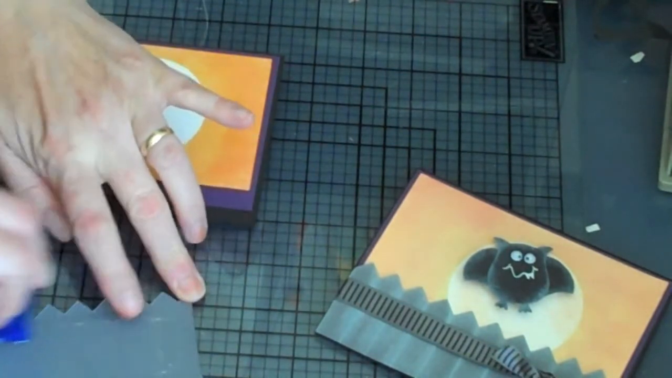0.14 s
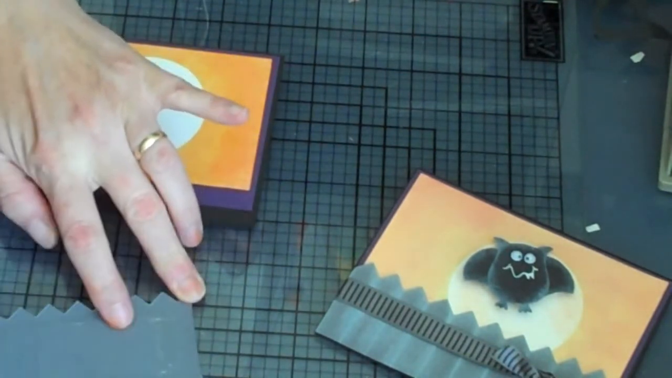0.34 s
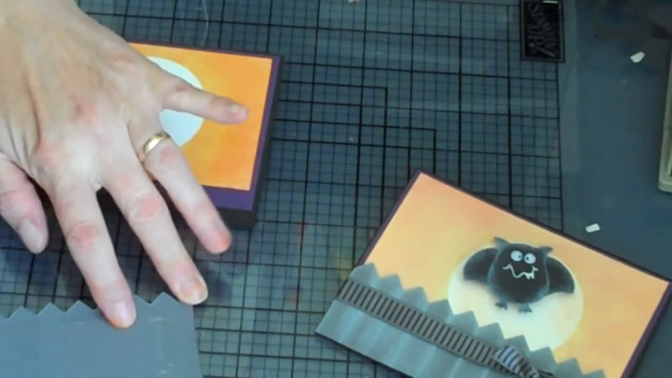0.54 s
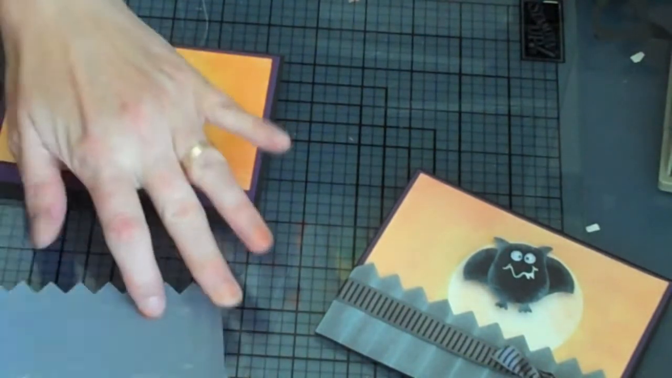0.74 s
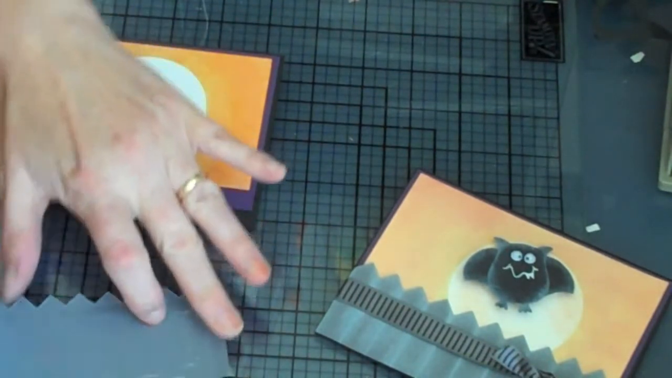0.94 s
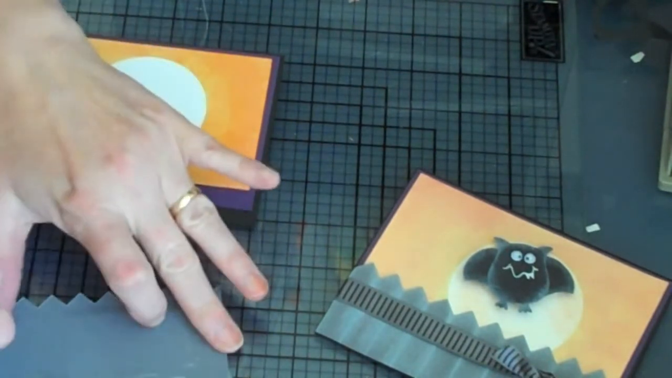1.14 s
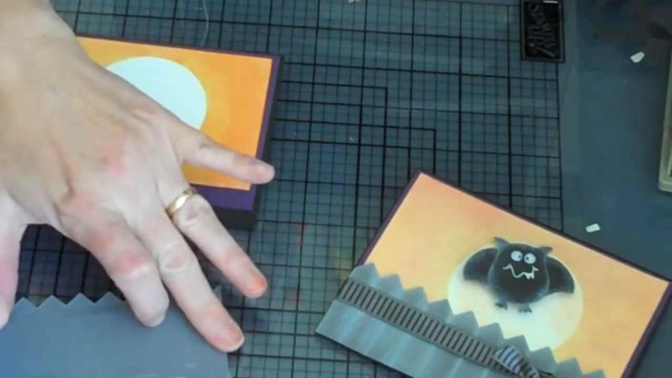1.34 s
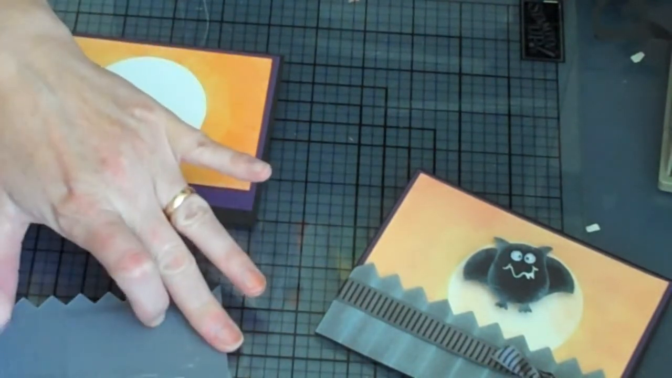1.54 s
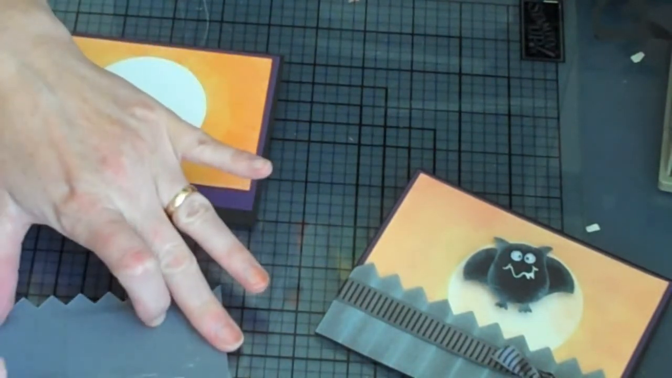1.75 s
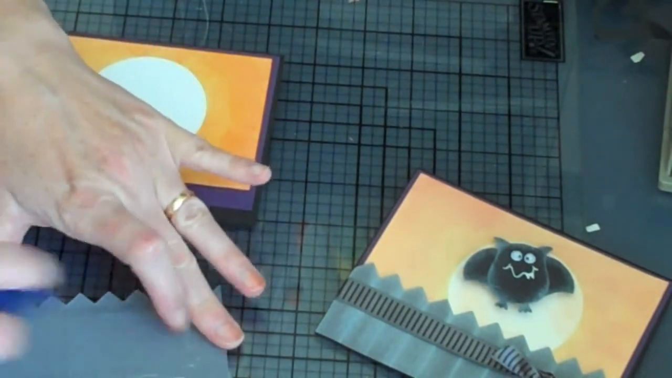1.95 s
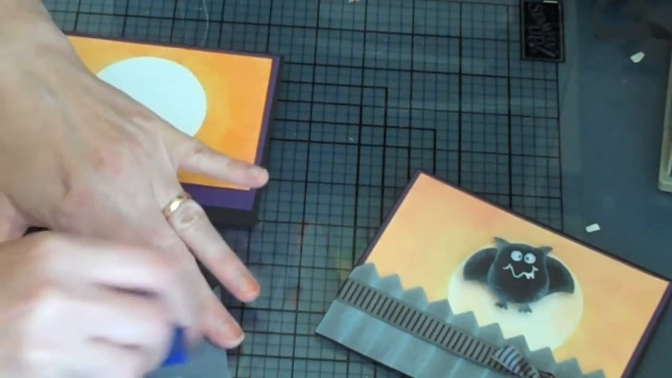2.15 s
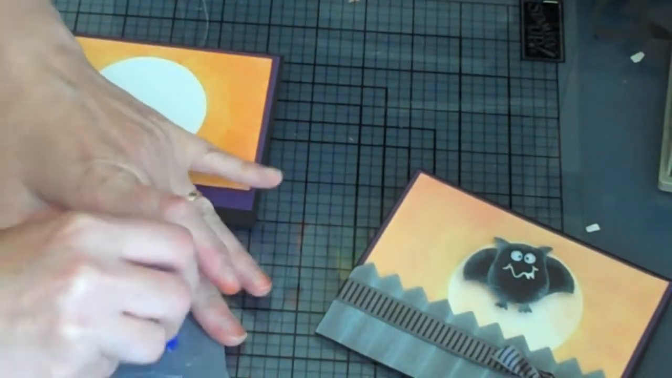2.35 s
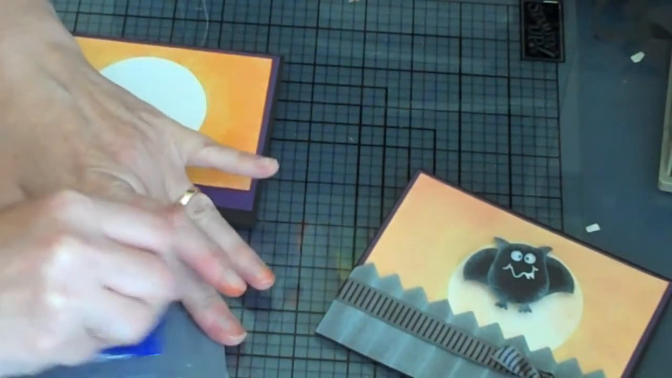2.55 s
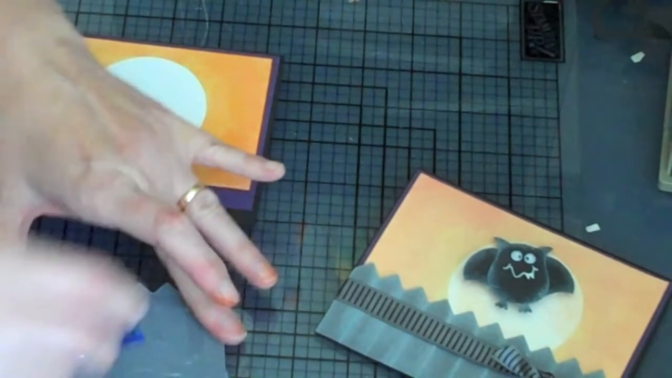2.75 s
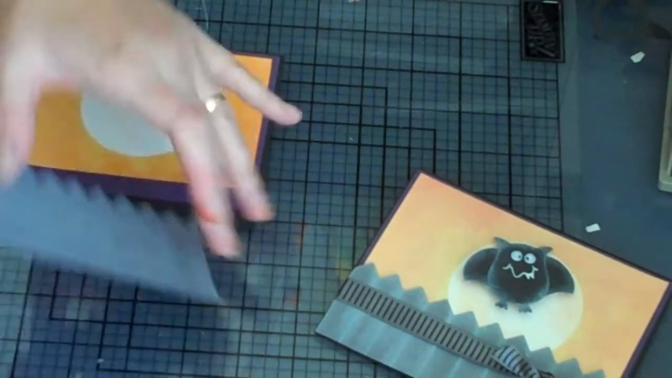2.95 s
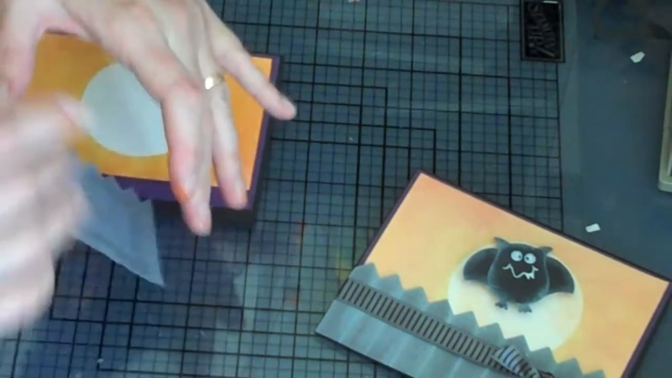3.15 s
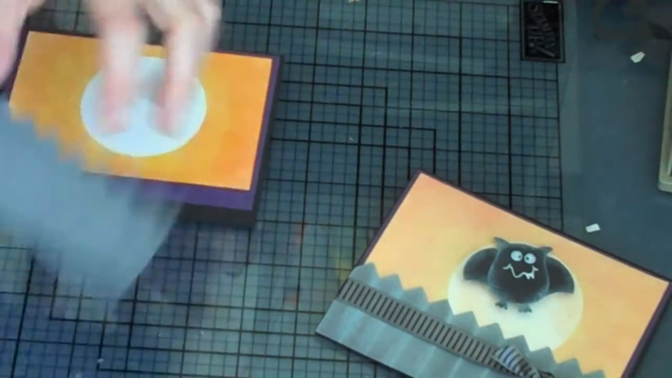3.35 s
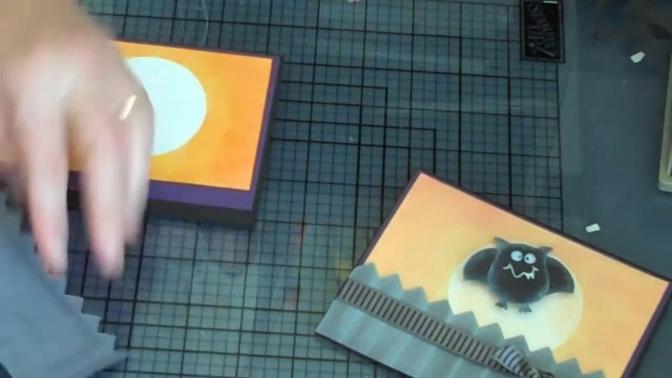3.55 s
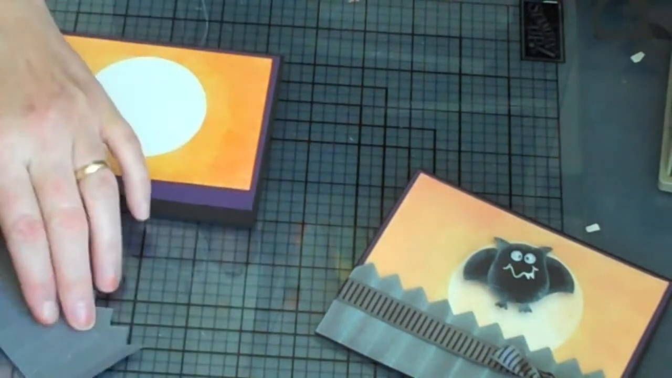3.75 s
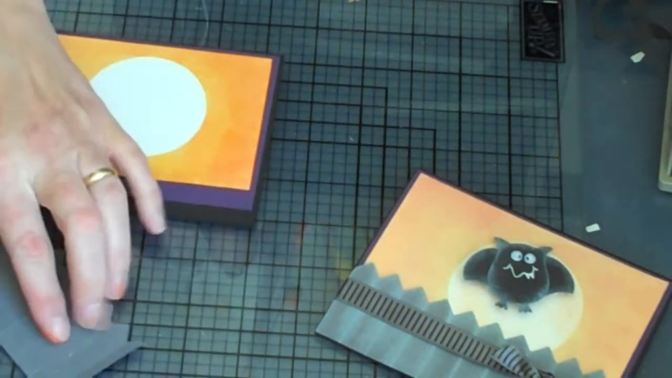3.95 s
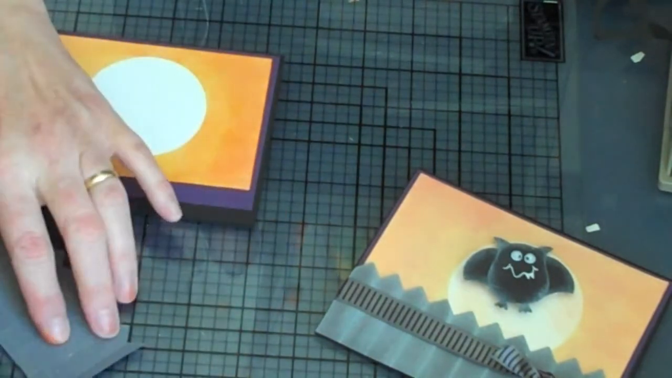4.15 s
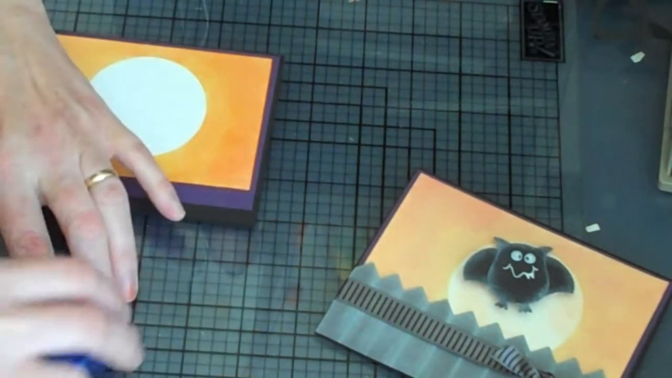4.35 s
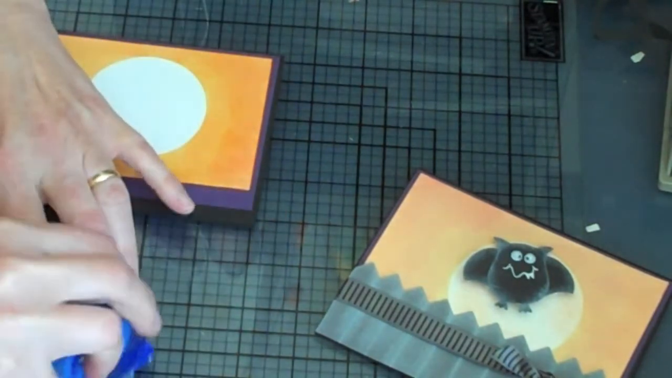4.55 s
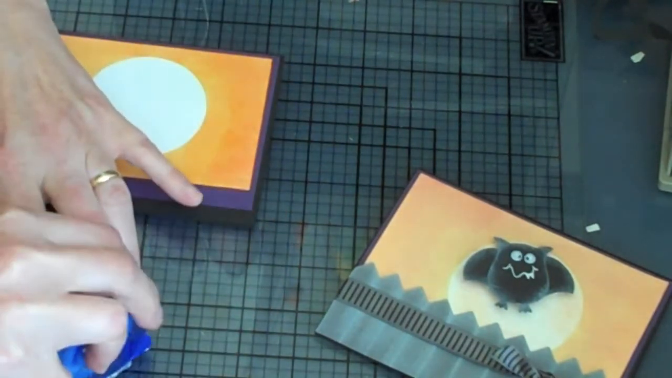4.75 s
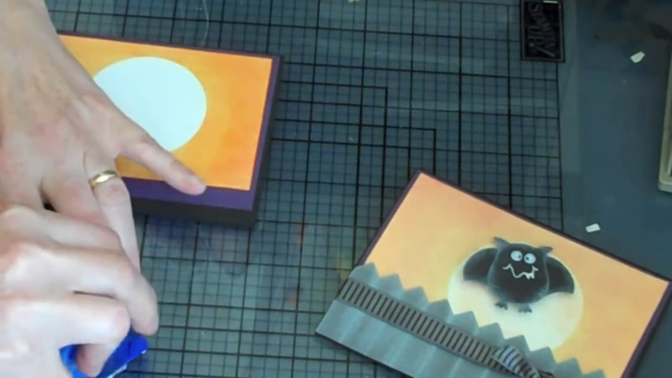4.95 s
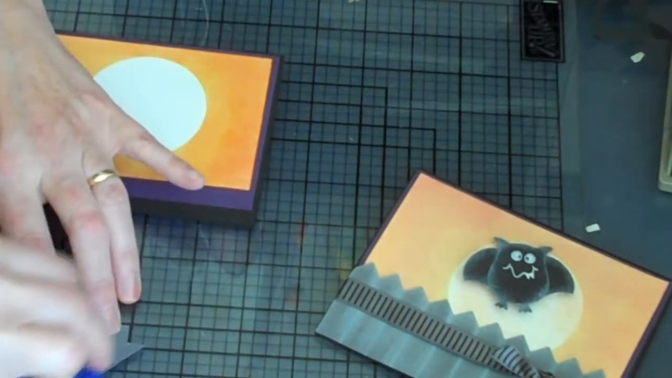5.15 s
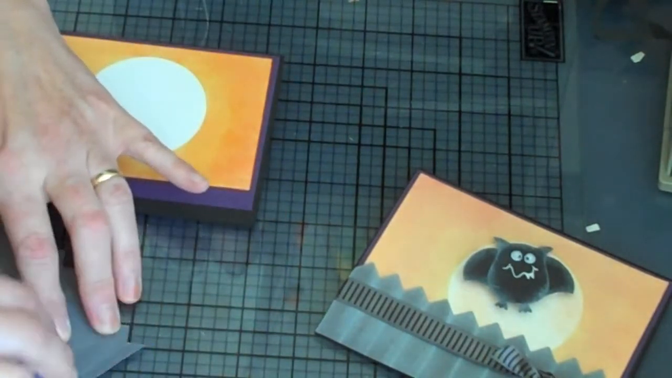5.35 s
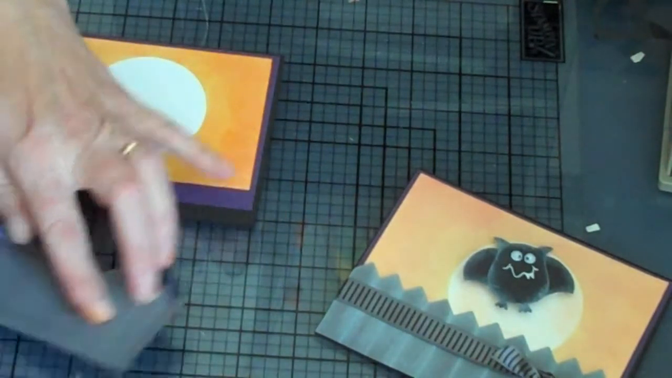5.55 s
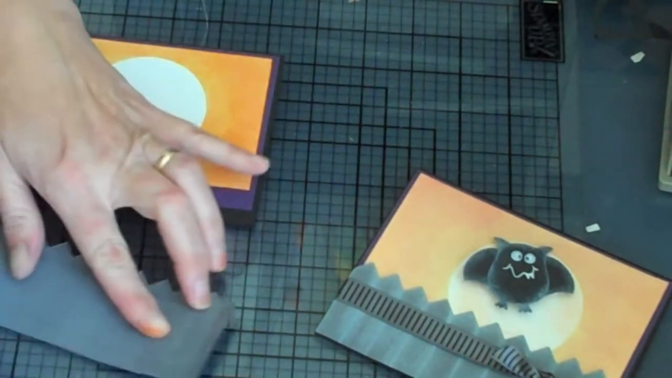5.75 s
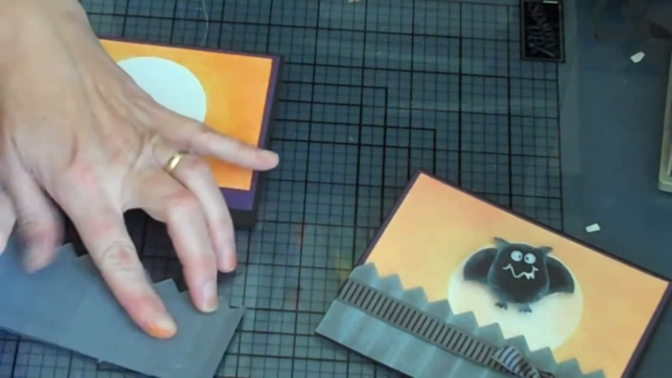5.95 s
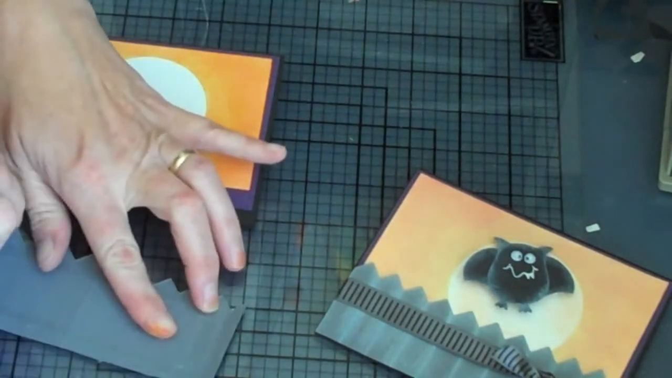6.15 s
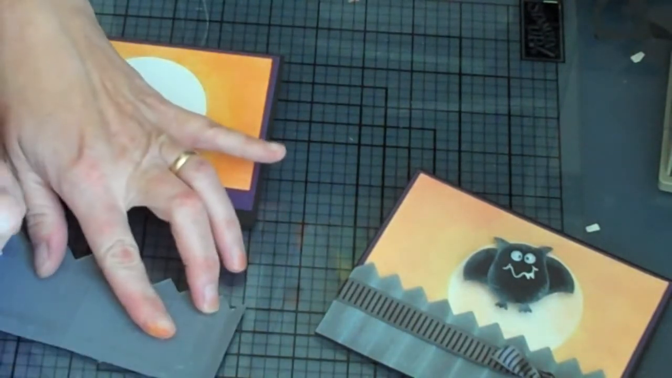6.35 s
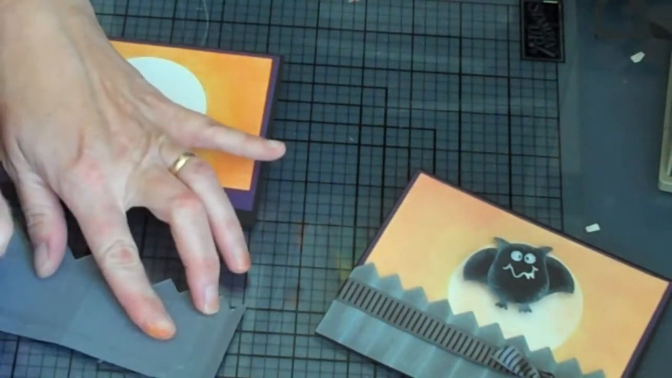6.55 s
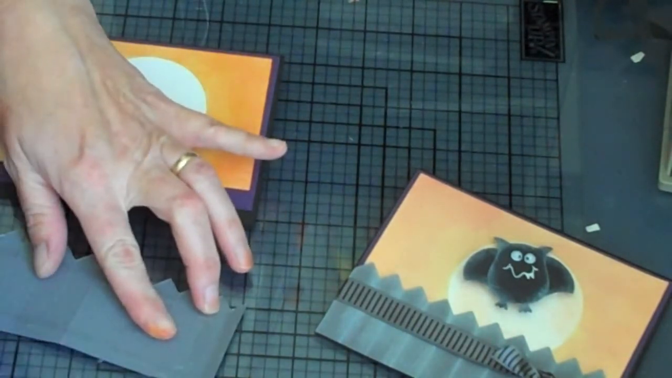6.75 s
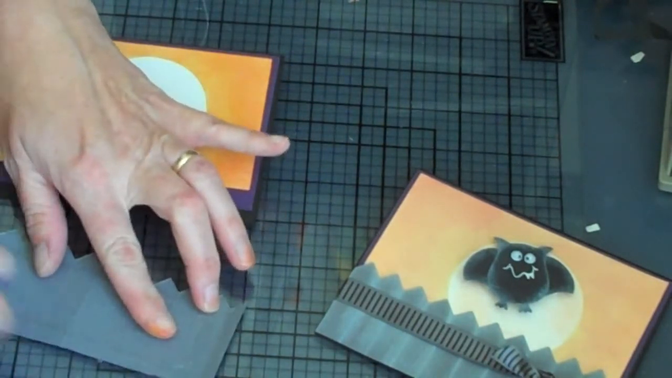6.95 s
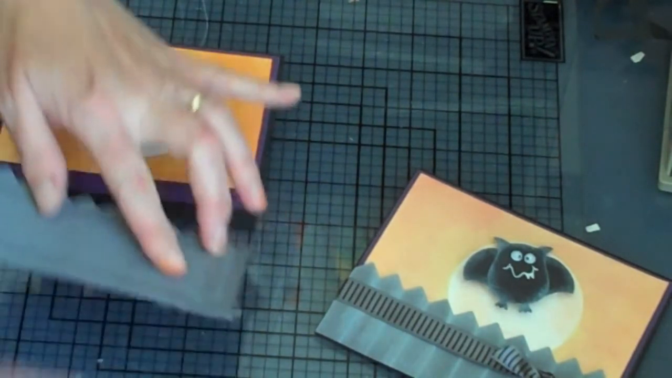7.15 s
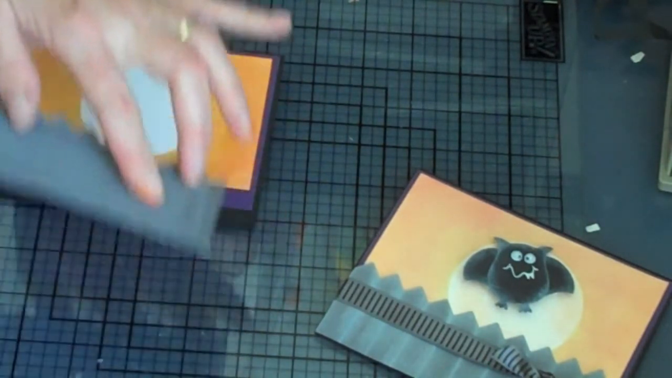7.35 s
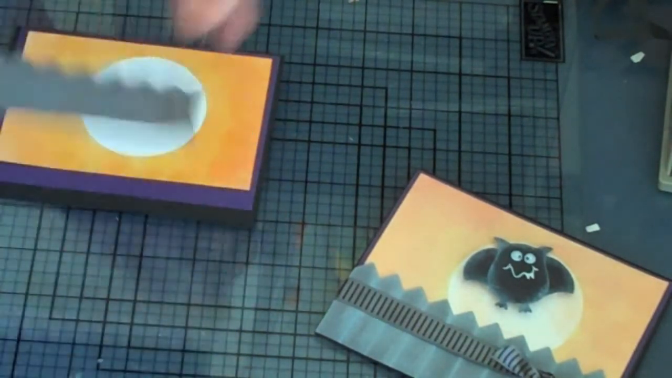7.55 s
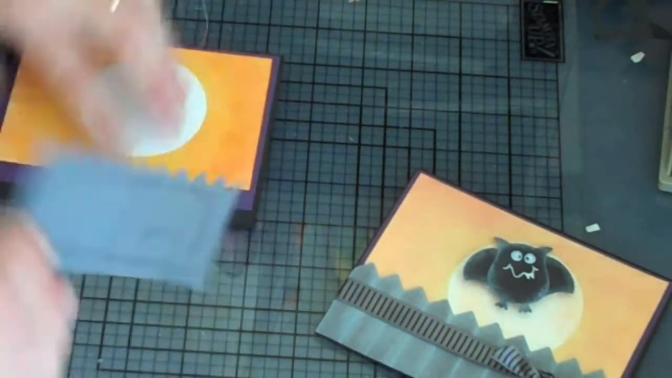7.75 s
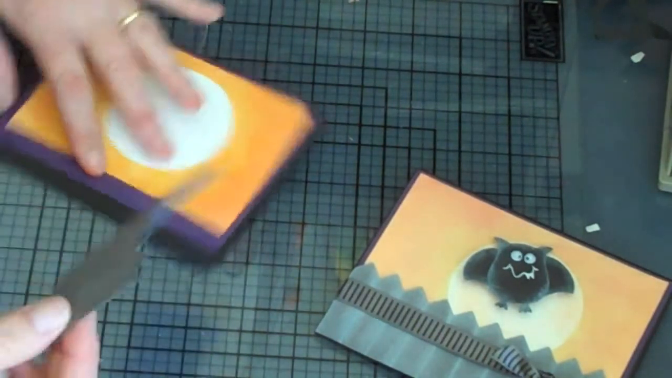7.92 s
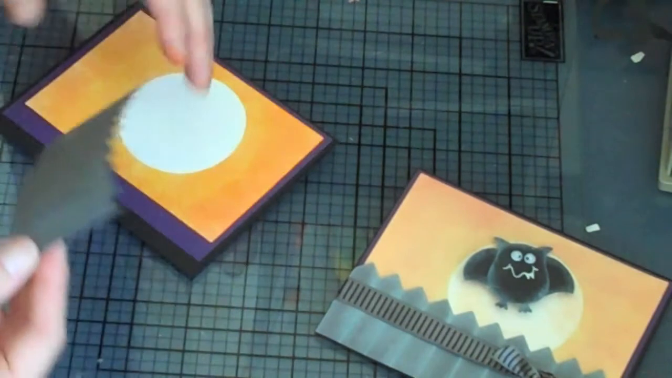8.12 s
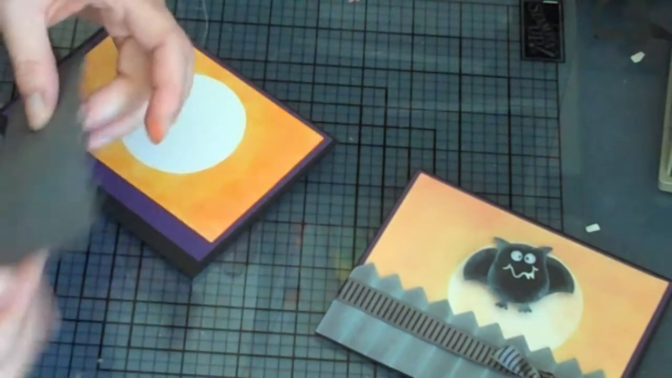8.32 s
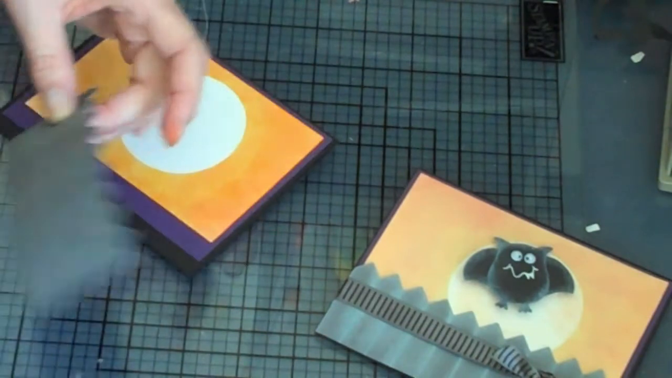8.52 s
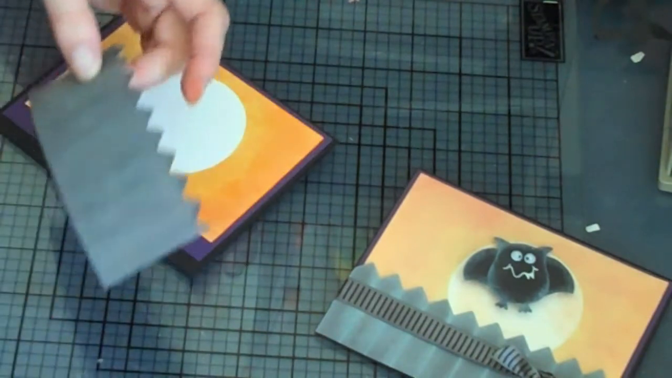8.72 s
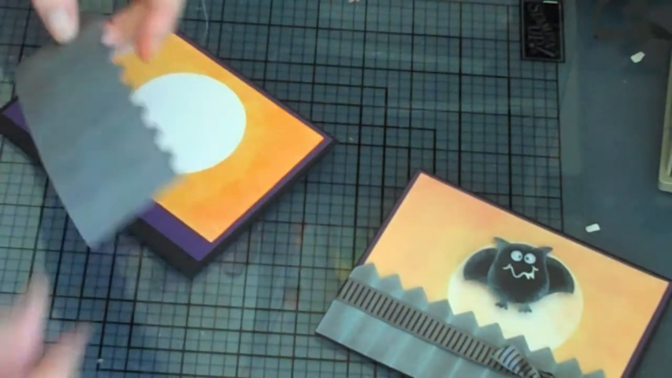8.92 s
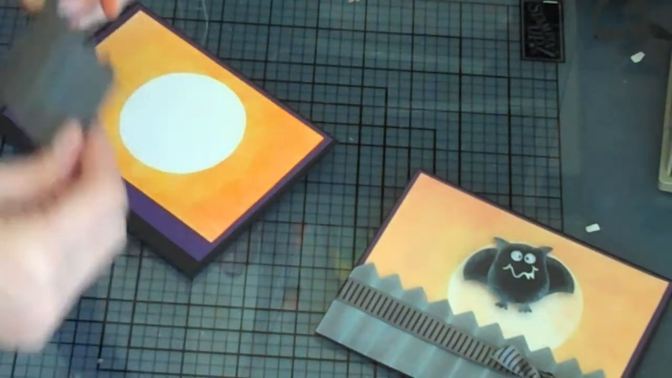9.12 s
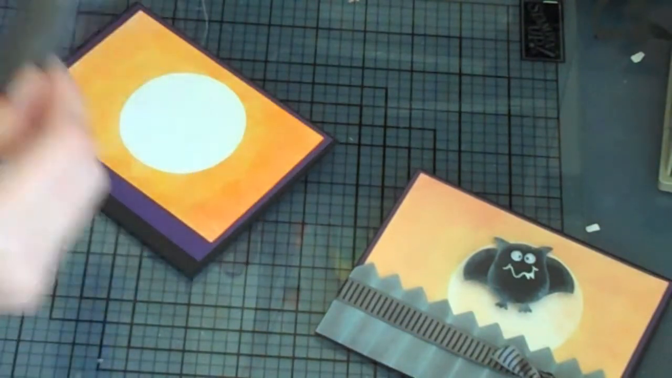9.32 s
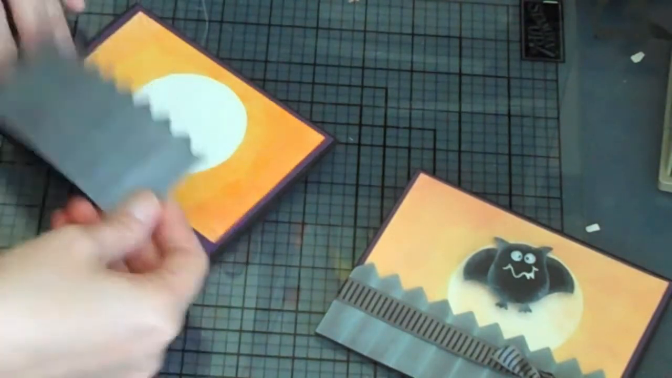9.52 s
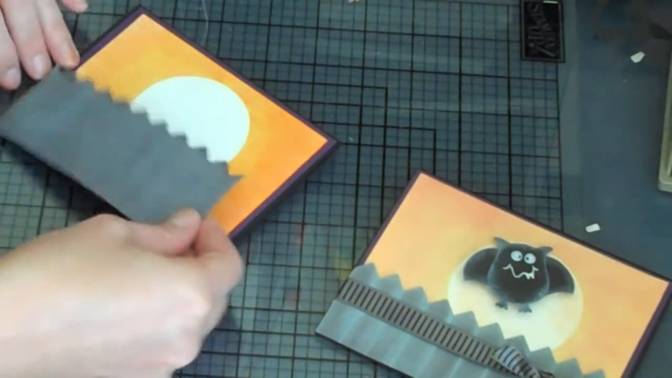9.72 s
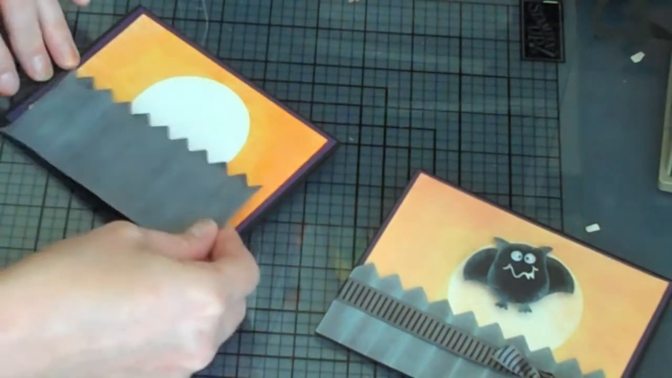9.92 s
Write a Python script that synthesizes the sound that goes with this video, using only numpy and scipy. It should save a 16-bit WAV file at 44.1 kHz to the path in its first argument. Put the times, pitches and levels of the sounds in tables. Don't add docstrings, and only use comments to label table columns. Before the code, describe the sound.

A plastic tape dispenser zips in brief bursts along stiff card; the strip snaps, ticks and knocks the desk, then handling fades into hiss.

```python
import sys
import numpy as np
from scipy import signal
from scipy.fft import rfft, irfft, next_fast_len
from scipy.io import wavfile
from scipy.ndimage import uniform_filter1d

SR = 44100
rng = np.random.default_rng(int(sys.argv[2]) if len(sys.argv) > 2 else 0)


def gain_from_db(level_db):
    decades = np.asarray(level_db, float) / 20
    return 10 ** decades


def materialize(psi):
    bounded = np.clip(np.atleast_2d(psi).T, -1, 1)
    quanta = np.round(bounded * 32767).astype(np.int16)
    wavfile.write(sys.argv[1], SR, quanta)


N = 440118


def unit(x):
    return x / np.sqrt(np.mean(x ** 2) + 1e-20)


def along(points, hz):
    f, v = np.transpose(points)
    return np.interp(np.log(hz + 1), np.log(f + 1), v)


def causal(gain):
    cepstrum = irfft(np.log(gain + 1e-6))
    half = cepstrum.shape[-1] // 2
    cepstrum[..., 1:half] *= 2
    cepstrum[..., half + 1:] = 0
    return np.exp(rfft(cepstrum))


def filtered(x, response, even=False):
    size = 2 * next_fast_len(N // 2 + SR // 8)
    h = response(np.fft.rfftfreq(size, 1 / SR))
    if even:
        h = h / np.sqrt(np.mean(abs(h) ** 2))
    return irfft(rfft(x, size) * h, size)[..., :N]


def slips(spiky_db, clump, patchy_db):
    z = signal.stft(rng.standard_normal((2, N + 256)), nperseg=128)[2]
    patches = uniform_filter1d(rng.standard_normal(z.shape[1:]), size=2, axis=0)
    patches = uniform_filter1d(patches, size=6, axis=1)
    pair = signal.istft(z * gain_from_db(patchy_db * unit(patches)), nperseg=128)[1][:, :N]
    size = unit(uniform_filter1d(rng.standard_normal(N), size=clump))
    return unit(gain_from_db(spiky_db * size) * pair)


def contacts(times, levels_db, ms, rise, fall, creep_db):
    early = SR // 40
    force = np.zeros((levels_db.shape[1], N + SR))
    t = np.arange(-early, SR // 8) / SR
    lives = np.clip(ms, .3, 60) / 1000
    for s, db, life in zip(times, levels_db, lives):
        onset = 1 - np.exp(-np.clip(t, 0, 1) / (rise * life))
        shape = onset * np.exp(-(t / (fall * life)) ** 2)
        shape += gain_from_db(creep_db) * np.exp(-abs(t) / 0.0052)
        start = max(round((s - rise * life) * SR), 0)
        force[:, start:start + len(t)] += gain_from_db(db)[:, None] * shape
    return force[:, early:early + N]


def hiss():
    # (frequency [Hz], level [dB])
    noise_colour = [(15, -46.5), (25, 0), (392, -2), (485, -2.5), (1870, -7), (6850, -12), (7420, -11),
                    (14000, -16.5)]
    # (frequency [Hz], left minus right [dB])
    noise_balance = [(60, 2.5), (180, 5.3), (550, 12), (1640, 9.4), (4950, 3.5), (14900, 2.5)]

    def colour(hz):
        return gain_from_db(along(noise_colour, hz) + np.outer([.5, -.5], along(noise_balance, hz)))

    return gain_from_db(-59) * filtered(rng.standard_normal((2, N)), colour, even=True)


def slide():
    # (time [s], rub level [dB])
    rubbing = [(0.0, -26.5), (0.11, -33.5), (0.61, -54), (1.42, -60.5), (1.66, -32), (1.94, -69),
               (2.64, -55), (4.97, -63.5), (5.14, -28), (5.39, -55), (6.42, -62.5), (6.61, -30),
               (6.89, -61), (7.34, -69.5), (7.53, -61), (9.53, -70), (9.98, -63.5)]
    # (frequency [Hz], level [dB])
    rub_colour = [(600, -34.5), (1600, -11.5), (3000, -10.5), (5500, -0.5), (7500, 0), (9200, -12.5),
                  (14000, -14.5)]
    s, db = np.transpose(rubbing)
    swell = gain_from_db(np.interp(np.arange(N) / SR, s, db) + 2)
    grains = swell * slips(spiky_db=-1.0, clump=150, patchy_db=2.5)
    return filtered(grains, lambda hz: gain_from_db(along(rub_colour, hz)), even=True)


def snap(force, part=lambda hz: 1):
    # (frequency [Hz], level [dB])
    snap_colour = [(1800, -36.5), (2600, -13.5), (3530, -12), (4300, -7), (5900, 2.5), (7300, 2),
                   (9250, -13.5), (10400, -16), (14000, -23.5)]
    return filtered(force, lambda hz: causal(gain_from_db(along(snap_colour, hz)) * part(hz)), even=True)


def case(force):
    # (frequency [Hz], width [Hz], level [dB])
    modes = [(1210, 320, -10), (1587, 140, 0.5), (1957, 310, -4), (2274, 250, -5.5)]

    def ring(f):
        total = 0
        for k, (centre, width, db) in enumerate(modes):
            damping = 1j * f * width
            total = total + (-1) ** k * gain_from_db(db) * damping / (centre * centre - f * f + damping)
        return total

    return filtered(force, ring, even=True)


def desk(force):
    # (frequency [Hz], level [dB])
    desk_colour = [(100, -24.5), (300, -0.5), (420, -8), (560, -3), (900, -3), (1500, -22)]
    return filtered(force, lambda hz: causal(gain_from_db(along(desk_colour, hz))), even=True)


def runner():
    # (time [s], snap level [dB], case level [dB])
    teeth = [(0.008, -11.5, -23.5), (0.022, -16, -25.5), (0.035, -11.5, -21), (0.05, -14, -31),
             (0.062, -16.0, -23), (0.076, -19, -23.5), (0.086, -10, -39.5), (0.1, -16, -42),
             (0.112, -14.5, -27), (0.125, -16.0, -33), (0.135, -12, -24), (0.148, -19.5, -28.5),
             (0.157, -11.5, -24.5), (0.171, -12.5, -34), (0.184, -11, -25), (0.195, -17, -35.5),
             (0.206, -14, -26.5), (0.22, -23, -21), (0.23, -13.5, -41), (0.243, -15, -35),
             (0.256, -17.5, -39), (0.268, -13.5, -27), (0.288, -13, -26.0), (0.31, -12, -44.5),
             (0.323, -34.5, -44), (0.336, -13.5, -28.5), (0.384, -21, -30.5), (1.5, -11.5, -25),
             (1.515, -13, -30), (1.531, -13.5, -25), (1.544, -14.5, -33.5), (1.555, -16.0, -32.5),
             (1.566, -19, -28.5), (1.576, -9, -26), (1.584, -14.5, -26.5), (1.601, -12.0, -29.5),
             (1.617, -12.5, -25), (1.634, -14.5, -28.0), (1.657, -16, -31.5), (1.717, -12, -33),
             (1.766, -13.5, -29.0), (2.504, -12, -31.0), (2.515, -16.5, -28), (2.524, -18, -31),
             (2.537, -11, -29.5), (2.545, -11.5, -30.5), (2.558, -20, -31.5), (2.57, -13, -26),
             (2.584, -20, -28), (2.601, -20.5, -40.5), (2.612, -11, -25.5), (4.961, -12.5, -29),
             (4.988, -15, -30), (5.011, -12.5, -33), (5.03, -11.5, -32), (5.048, -13.5, -32.0),
             (5.065, -9.5, -34.5), (5.081, -13, -25), (5.1, -18, -38.0), (5.117, -14, -33),
             (5.129, -15, -30.5), (5.144, -24, -26.5), (5.157, -12.5, -35), (5.175, -12, -34),
             (5.195, -15.5, -26.5), (5.214, -11.5, -32.5), (5.237, -14, -28), (6.417, -13, -24.5),
             (6.428, -19.5, -34), (6.447, -11.5, -31), (6.468, -12.5, -26.5), (6.498, -12.5, -29),
             (6.536, -14.5, -30.5), (6.557, -13, -30.5), (6.572, -17.0, -29.5), (6.588, -14.5, -22),
             (6.606, -15.5, -32), (6.619, -14, -31), (6.634, -17, -22.5), (6.647, -14.5, -28),
             (6.661, -14, -30), (6.674, -16.0, -33.5), (6.693, -20, -41)]
    rows = np.array(teeth)
    life_ms = 5.35 * gain_from_db(rng.normal(0, 1.0, len(rows)))
    bright, hollow = contacts(rows[:, 0], rows[:, 1:], life_ms, rise=.15, fall=0.98, creep_db=-18)
    chatter = slips(spiky_db=4, clump=14, patchy_db=2.0)
    snaps = gain_from_db(-2.0) * snap(bright * chatter)
    rings = gain_from_db(-0.5) * case(hollow * chatter)
    shakes = gain_from_db(-31.5) * desk(hollow * chatter)
    return snaps + rings + shakes


def strip():
    # (time [s], crisp level [dB], full level [dB], hollow level [dB], contact [ms])
    between_swipes = [(0.452, -42.5, -46, -50.0, 5.2), (0.466, -36.5, -49, -55.0, 2.3),
                      (0.485, -38, -51, -49, 10), (0.499, -19, -22, -32, 1.4),
                      (0.538, -11, -26.5, -34.5, 3.9), (0.636, -28, -48, -56, 1.0),
                      (0.645, -41.5, -46.5, -39.5, 7.5), (0.711, -46, -43.0, -38.5, 8.7),
                      (0.727, -46, -47.0, -40, 2.3), (0.859, -34, -47, -55.0, 2.7),
                      (0.973, -40.5, -47.0, -59.0, 2), (1.105, -48, -59, -71.0, 8.3),
                      (1.343, -32.5, -29, -30.5, 3.9), (1.357, -34, -39.5, -39.5, 10.0),
                      (1.445, -55, -62, -49, 2.6), (1.469, -35, -43, -41, 2.0),
                      (1.828, -32.5, -38.5, -56.5, 9.4), (1.901, -43, -50, -56.0, 4.0),
                      (2.033, -40.5, -45.0, -56, 2.7), (2.117, -21, -24.5, -44.5, 2.5),
                      (2.223, -51, -62.0, -65, 3.0), (2.259, -41, -64, -63.0, 1.0),
                      (2.272, -39, -48, -53.0, 3.0), (2.308, -33, -50, -38, 0.71),
                      (2.328, -46, -54, -58, 8.6), (2.384, -47.0, -53.0, -56.0, 3.0),
                      (2.418, -28, -35, -36, 4.9), (2.429, -24.5, -27, -36, 3.3),
                      (2.484, -43, -46, -32, 1.3), (2.67, -31.5, -41, -43.5, 20),
                      (2.692, -29, -37, -51, 2.4), (2.748, -52.5, -59, -69, 10),
                      (2.781, -48, -53, -60, 5.2), (2.793, -46.5, -52.0, -51, 2.1),
                      (2.818, -47, -44, -53, 4.0), (2.83, -41, -54.0, -58, 2.5),
                      (2.892, -9.0, -13.0, -22, 4.7), (2.938, -2.5, -9, -11.5, 4.04),
                      (2.982, 0, -7.5, -14.5, 3.4), (3.013, -21, -24.0, -19.5, 5.6),
                      (3.033, -16, -20.5, -28, 3.1), (3.057, 0, -6, -4.5, 3.06),
                      (3.185, -24.5, -31, -30.5, 1.4), (3.261, -43.5, -49, -59.0, 4.0),
                      (3.372, -41.5, -50, -52, 1.0), (3.383, -14.5, -17.5, -24, 1.3),
                      (3.538, -38.5, -44, -61.0, 6.0), (3.557, -40.5, -45.0, -50, 7.6),
                      (3.593, -21.5, -27, -43, 0.93), (3.61, -26.5, -35.5, -45, 5.5),
                      (3.745, -29, -55, -60, 0.82), (3.827, -41, -49.0, -56.0, 2.3),
                      (3.839, -32.5, -36.5, -44, 6.1), (3.865, -22.5, -24.5, -36.5, 3.2),
                      (3.88, -22.5, -30.5, -34.5, 5.7), (3.897, -32, -35.0, -39, 2.5),
                      (3.927, -16.5, -33, -41, 1.5), (3.979, -38.5, -38, -34, 2.6),
                      (3.993, -37.5, -32, -29, 1.2), (4.033, -45.5, -47.5, -47, 12),
                      (4.092, -14.0, -17.5, -25.0, 3.7), (4.206, -22.5, -28, -33, 6.7),
                      (4.245, -27.5, -35, -36, 1.8), (4.27, -38, -46.0, -52, 4.4),
                      (4.327, -34.5, -41.5, -57, 4.7), (4.49, -52, -54.0, -62, 5.4),
                      (4.514, -42, -36, -34, 2.0), (4.523, -30.5, -29, -34.5, 0.93),
                      (4.562, -28, -27, -30, 0.85), (4.578, -48, -42, -44, 3.0),
                      (4.632, -34, -37.5, -42, 4.0), (4.645, -22.5, -27, -23, 1.1),
                      (4.692, -46, -47, -55, 4.0), (4.741, -44, -51, -61.0, 5.0),
                      (4.761, -52.5, -49.5, -49, 3.3), (4.871, -62, -53, -49.0, 5.0),
                      (4.9, -41, -40, -35.5, 1.1), (4.923, -48, -53.0, -55.0, 9.3),
                      (4.943, -36.5, -45, -51.0, 2.8), (5.32, -37.0, -36, -40, 2.0),
                      (5.333, -33.5, -41, -46, 10), (5.347, -22.5, -41, -44, 0.83),
                      (5.361, -12, -33, -35, 1.3), (5.378, -34, -40, -43.5, 5.5), (5.439, -47, -55, -57, 5),
                      (5.506, -47.5, -61.0, -69, 1.6), (5.617, -38, -56, -61.0, 1.0),
                      (5.656, -35.5, -49, -61.0, 2.0), (5.735, -38, -53, -71.0, 0.87),
                      (5.872, -37.5, -46, -53, 4.0), (5.901, -40, -67, -67.0, 2.7),
                      (5.922, -19, -31, -41.5, 2.3), (5.968, -42.5, -63, -70, 3.0),
                      (6.14, -45.5, -50.0, -52, 3.4), (6.179, -34, -40.5, -49.5, 2.0),
                      (6.241, -41, -42.5, -56, 2.3), (6.34, -36, -56.0, -64, 0.66)]
    # (time [s], crisp level [dB], full level [dB], hollow level [dB], contact [ms])
    placing = [(6.806, -15.5, -25.5, -32, 3.1), (6.836, -19, -30, -36.5, 3.5), (6.897, -32, -41, -50, 4.3),
               (7.026, -46.0, -58.0, -67.0, 2.0), (7.046, -34.5, -47, -46.0, 1.3),
               (7.058, -3.5, -9.5, -17.5, 4.2), (7.105, -8.5, -16, -18, 5.9),
               (7.124, -10.5, -12, -8.5, 2.9), (7.137, -1.0, -8.0, -21, 5.8),
               (7.157, -14.5, -19.0, -16.5, 4.3), (7.216, -8.5, -12.5, -16.5, 3.1),
               (7.248, -15.5, -17.5, -15, 3.2), (7.287, -32, -41.0, -46, 3.0), (7.358, -20, -23, -50, 21),
               (7.383, -11, -12, -24, 0.83), (7.432, -36.5, -40.0, -53, 13.0),
               (7.477, -10.5, -25.5, -32, 1.04), (7.746, -40.0, -43.5, -41.5, 3.3),
               (7.76, -40, -43, -47, 2.3), (7.769, -42.5, -52.0, -57, 6.0), (7.839, -53, -55.5, -65, 33),
               (7.882, -49.5, -55, -67, 46), (8.117, -50.5, -59, -70, 19), (8.22, -22, -23, -34.5, 1.2),
               (8.264, -21.5, -30.5, -41, 2.9), (8.289, -35, -45.5, -58, 60),
               (8.343, -20, -25.5, -42.5, 1.1), (8.458, -45, -54, -55, 3.8),
               (8.617, -52.5, -61.5, -71.0, 15), (8.846, -54.5, -65.0, -70.5, 22),
               (9.008, -38.5, -46, -52, 2.2), (9.018, -42.5, -51.5, -52, 7),
               (9.173, -27.5, -29.5, -40, 4.2), (9.522, -28, -37.0, -30, 1.2),
               (9.543, -46, -49.0, -52, 5.5), (9.772, -56, -57, -72.5, 13), (9.87, -53.5, -59.0, -70, 9.6),
               (9.923, -56, -60.5, -71.5, 17)]
    rows = np.array(between_swipes + placing)
    crisp, full, hollow = contacts(rows[:, 0], rows[:, 1:4], rows[:, 4], rise=.2, fall=0.94, creep_db=-22.5)
    crackle = slips(spiky_db=4.0, clump=10, patchy_db=3.5)

    def upper(hz):
        return 1 / (1 + (4800 / (hz + 1)) ** 8)

    snaps = snap(crisp * crackle, upper) + snap(full * crackle, lambda hz: 1 - upper(hz))
    return gain_from_db(3.5) * snaps + gain_from_db(3.0) * case(hollow * crackle)


def knocks():
    # (time [s], knock level [dB], thump level [dB])
    landings = [(.538, -48, -75), (1.339, -49, -51), (2.03, -61, -71), (2.116, -49, -70), (2.417, -45, -54),
                (2.894, -37.5, -55), (2.939, -24.5, -42), (2.98, -21.5, -41), (3.033, -38, -55),
                (3.054, -29, -38), (3.382, -44.5, -77), (3.599, -52.5, -63), (3.873, -40.5, -73),
                (4.09, -27, -52), (4.519, -63, -66), (5.922, -53, -72), (6.174, -63, -64),
                (7.058, -35.5, -56.5), (7.104, -29, -50), (7.136, -23.5, -49), (7.222, -33.5, -59),
                (7.38, -31, -63), (7.476, -45, -68), (7.765, -55.5, -57), (8.219, -48, -72),
                (8.341, -47.5, -72), (9.165, -44.5, -67), (9.499, -61.5, -65)]
    rows = np.array(landings)
    knock, = contacts(rows[:, 0], rows[:, 1:2], np.full(len(rows), 7.), rise=.15, fall=0.98, creep_db=-29)
    push = np.zeros(N)
    push[(rows[:, 0] * SR).astype(int)] = gain_from_db(rows[:, 2] + 27)

    def stand(f):
        sway = 1j * f * 30 / (62 ** 2 - f * f + 1j * f * 30)
        flex = 1j * f * 60 / (180 ** 2 - f * f + 1j * f * 60)
        return sway - .8 * flex

    airborne = gain_from_db(3.5) * desk(knock * rng.standard_normal((2, N)))
    return airborne, filtered(push, stand, even=True)


def room(pair, count=4):
    # (frequency [Hz], time to fall 60 dB [s])
    decay = [(200, 0.27), (1500, 0.17), (6000, 0.16), (13000, 0.12)]
    place = (np.arange(N) * 7 // SR) % count
    echo = 0
    for k in range(count):
        hz, t, z = signal.stft(rng.standard_normal((2, SR // 4)), SR, nperseg=128)
        fade = gain_from_db(-60 * t / along(decay, hz)[:, None])
        tail = signal.istft(z * fade, SR, nperseg=128)[1]
        tail = tail / np.linalg.norm(tail[0])
        echo = echo + signal.oaconvolve(pair * (place == k), tail, axes=1)[:, :N]
    return np.pad(echo, ((0, 0), (60, 0)))[:, :N]


def ports(pair):
    # (frequency [Hz], left minus right [dB])
    port_balance = [(300, 0), (2700, 1), (4500, 1), (6000, -6.5), (7200, 13), (9300, 10), (10300, 14.5),
                    (14500, 18)]
    # (frequency [Hz], share [0-1])
    separate = [(300, .06), (2000, 0.02), (4500, 0.09), (7000, 0.2), (12000, 1)]

    def split(hz):
        turn = np.arcsin(np.sqrt(np.clip(along(separate, hz), 0, .5)))
        return np.array([np.cos(turn), np.sin(turn)])

    def resonance(hz):
        facing = gain_from_db(np.outer([.5, -.5], along(port_balance, hz)))
        return causal(facing / np.sqrt(np.mean(facing ** 2, 0)))

    mid, side = filtered(pair, split)
    return filtered(np.array([mid + side, mid - side]), resonance)


def scene():
    knock, thump = knocks()
    near = runner() + strip() + knock
    return ports(near + gain_from_db(-5.5) * room(near) + slide()) + thump + hiss()


def band_limit(x):
    return signal.sosfilt(signal.butter(12, 15530, fs=SR, output="sos"), x)


def record(dry):
    top_hz = 14250
    ceiling, hardness = 1.02, 8
    kept = filtered(dry, lambda hz: np.where(hz < top_hz, 1, gain_from_db(-37.5)))
    clipped = kept / (1 + abs(kept / ceiling) ** hardness) ** (1 / hardness)
    return band_limit(clipped)


dry = scene()
out = record(dry)
materialize(out)
```